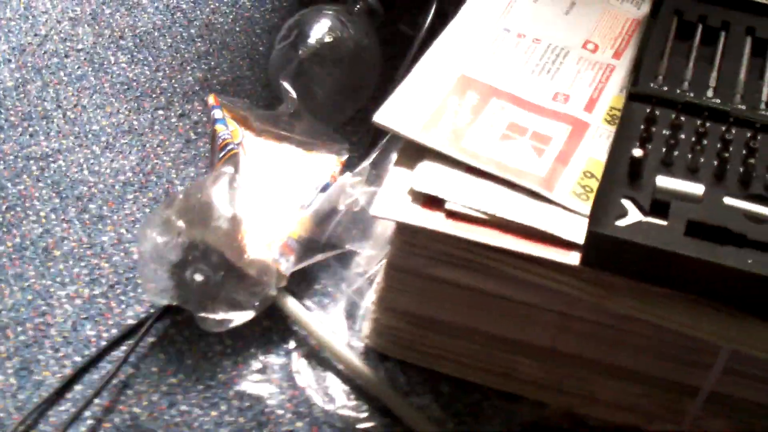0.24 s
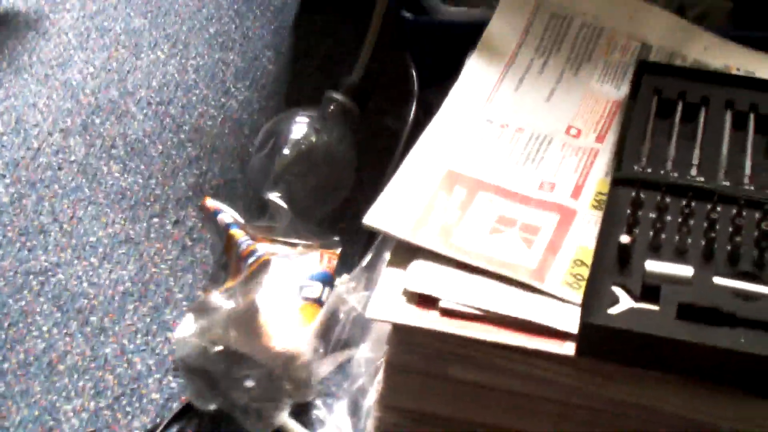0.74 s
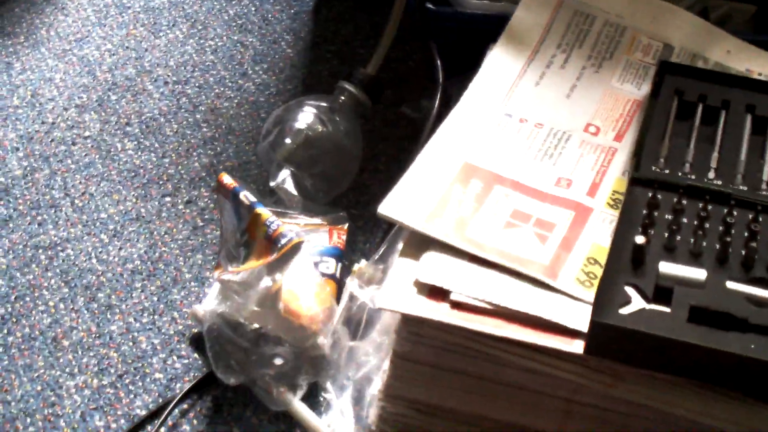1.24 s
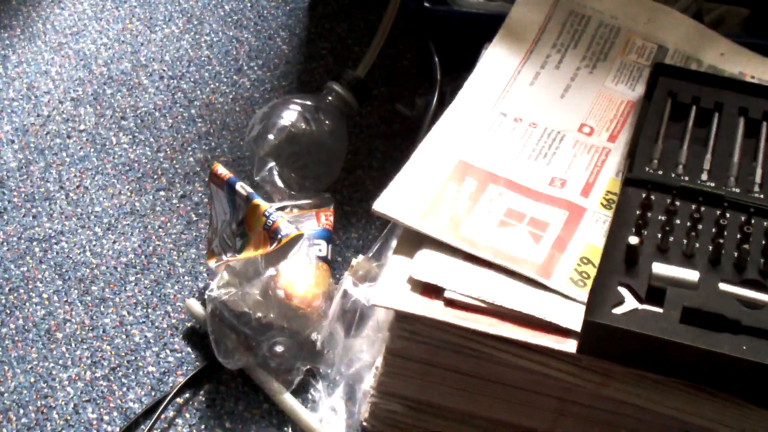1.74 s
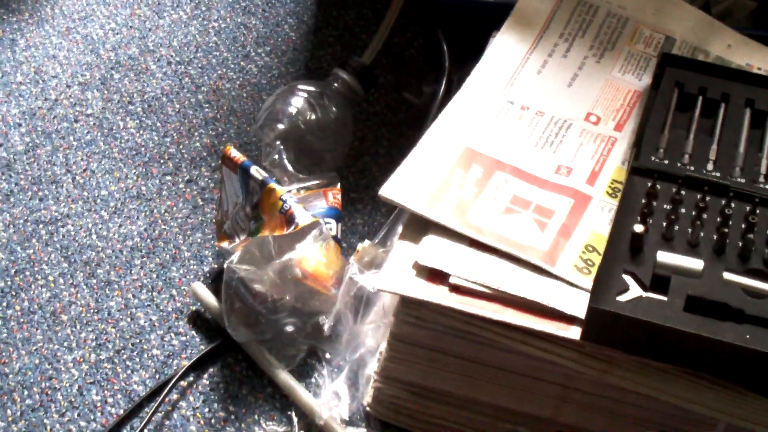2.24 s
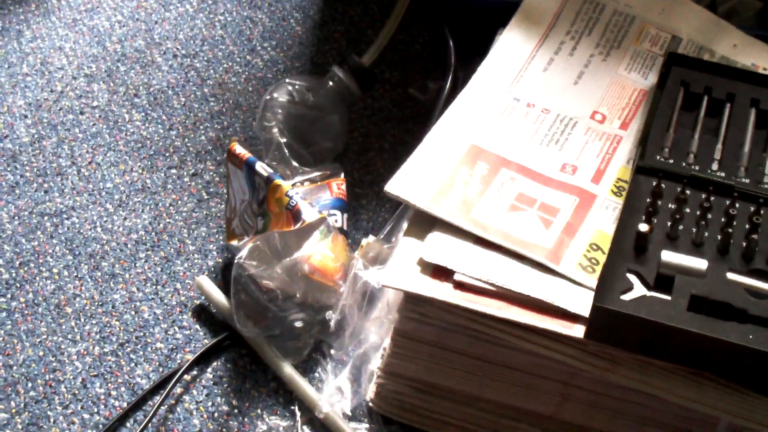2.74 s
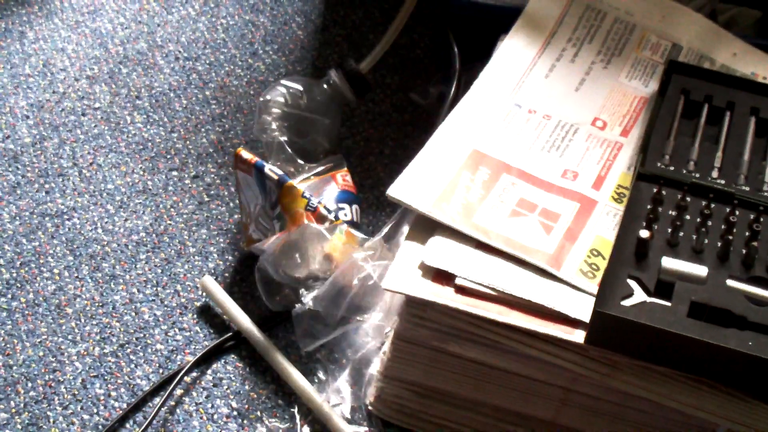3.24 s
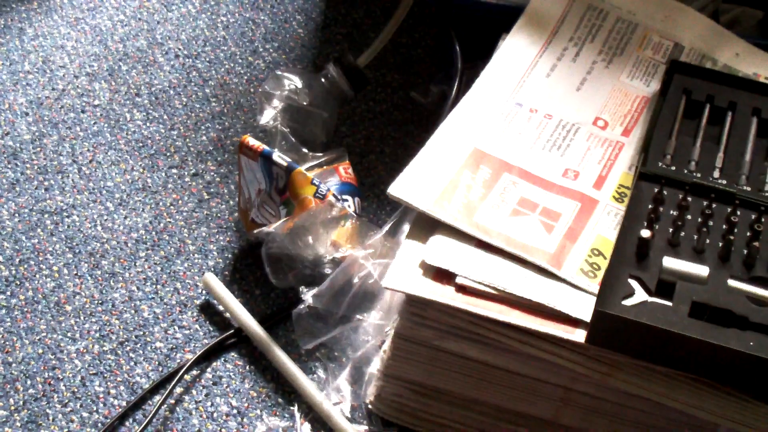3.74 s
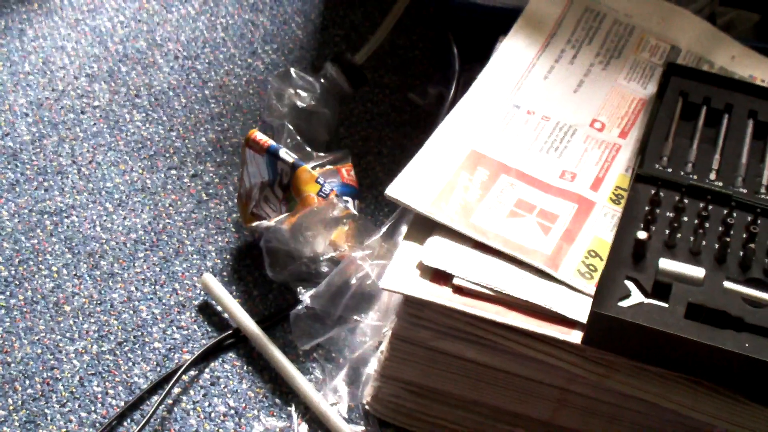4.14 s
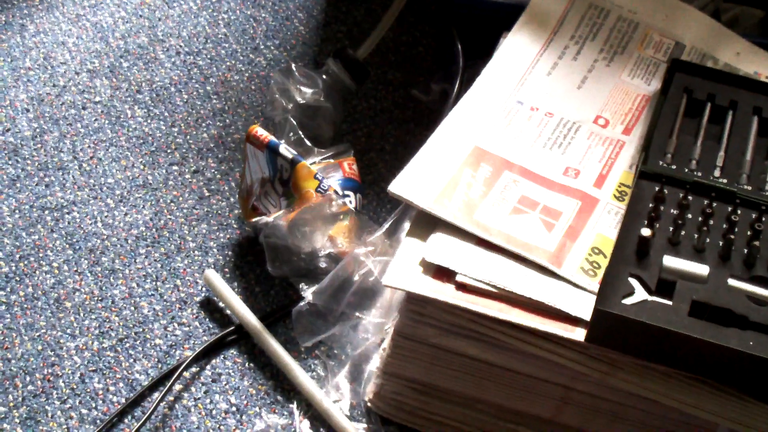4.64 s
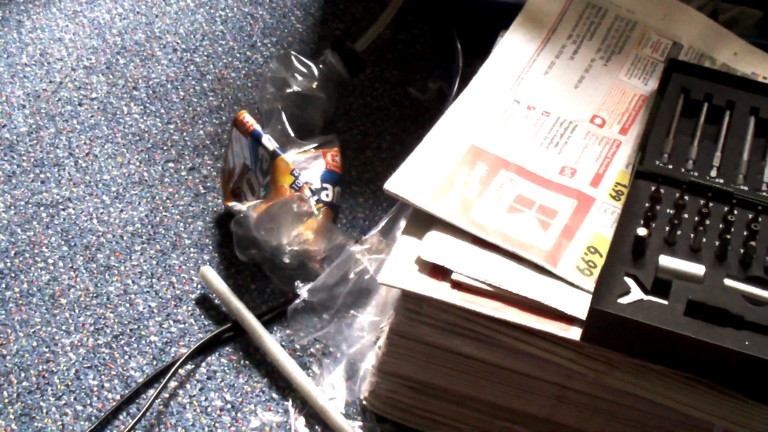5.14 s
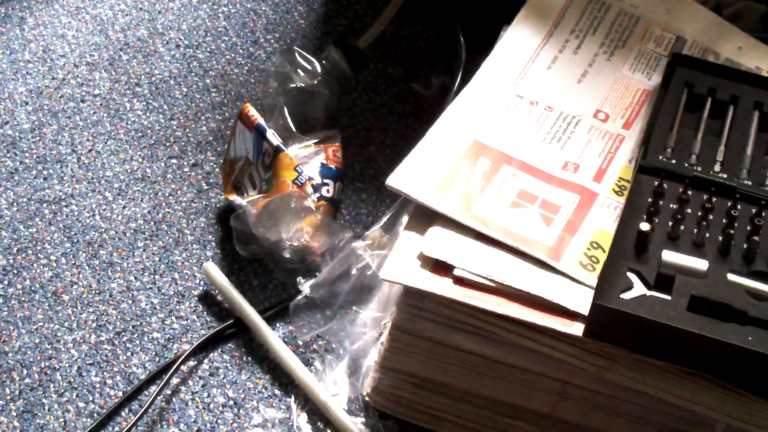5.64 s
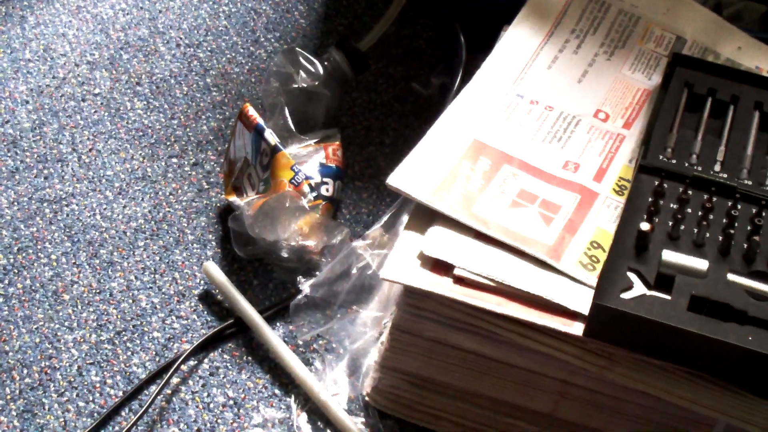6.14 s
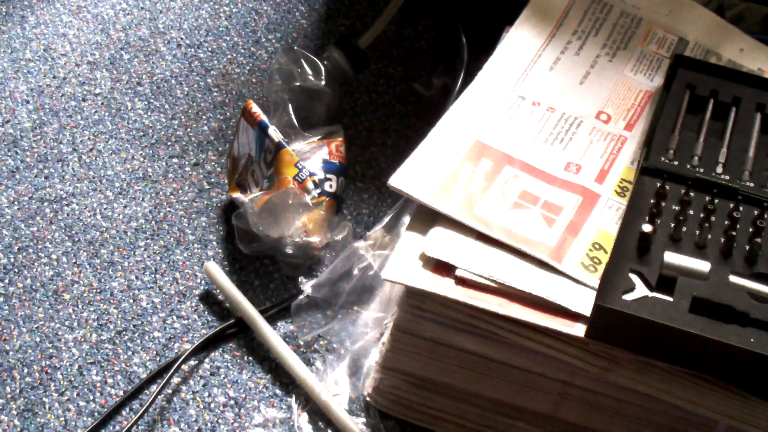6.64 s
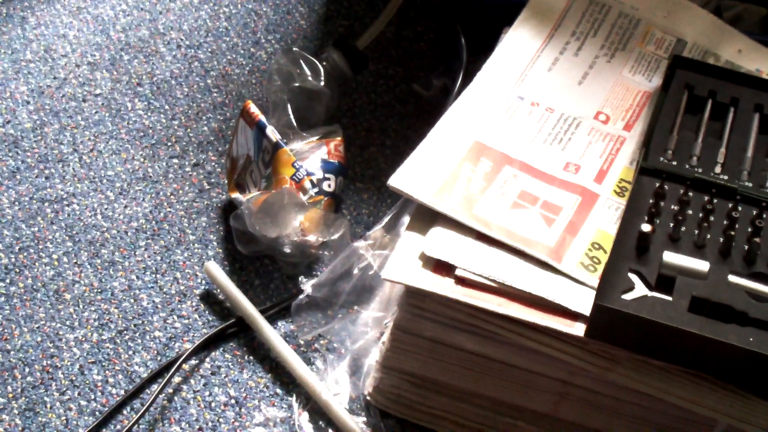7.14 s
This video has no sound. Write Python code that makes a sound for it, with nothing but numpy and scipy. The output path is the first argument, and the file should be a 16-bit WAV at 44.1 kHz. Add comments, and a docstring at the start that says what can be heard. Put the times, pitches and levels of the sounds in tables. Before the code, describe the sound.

In a small, fairly dry room, a thin plastic bottle collapses right beside the microphone. Hard irregular snaps and pops start at once, with crackly runs of creasing and small ticks between them. Below is a faint low pump hum, above it a bright hiss that slowly thins. The loudest snaps distort; after about five seconds they become sparser and mostly lighter.

```python
"""Small room, a microphone with two close ports right by a thin plastic bottle on the carpet.
From the start a vacuum pump hums low (sines over rumble), and a bright hiss (shaped noise) thins out as
the air runs out. At once the bottle is sucked flat: its wall buckles in single snaps, some followed by
small ticks, then also in longer runs of creasing. Each buckle is a burst of tiny slips coloured by the
wall, and the loud ones overload the microphone; towards the end the snaps grow sparse."""
import sys
import numpy as np
from scipy import signal
from scipy.fft import rfft, irfft, next_fast_len
from scipy.io import wavfile
from scipy.ndimage import uniform_filter1d

SR = 44100
rng = np.random.default_rng(int(sys.argv[2]) if len(sys.argv) > 2 else 0)


def waveform_to_disk(signal):
    """Save audio, clipped to [-1, 1], as 16-bit WAV at the path in sys.argv[1]."""
    frames = np.transpose(np.atleast_2d(signal))
    scaled = np.clip(frames, -1, 1) * 32767
    samples = np.round(scaled).astype(np.int16)
    wavfile.write(sys.argv[1], SR, samples)


N = 326781


def from_db(db):
    """Decibels to gain."""
    return 10 ** (np.asarray(db) / 20)


def unit(x):
    """Scale to an energy of one."""
    return x / np.sqrt(np.sum(x ** 2, axis=-1, keepdims=True) + 1e-20)


def at_hz(points, hz):
    """Read a table on a log-frequency axis."""
    points = np.array(points)
    return np.interp(np.log(np.maximum(hz, 1)), np.log(points[:, 0]), points[:, 1])


def butter(x, kind, edge_hz, order=2):
    """Causal Butterworth filter."""
    edge_hz = np.clip(edge_hz, 10, .45 * SR)
    sections = signal.butter(order, edge_hz, kind, fs=SR, output="sos")
    return signal.sosfilt(sections, x + 1e-18)


def resonance(x, hz, width_hz):
    """Two-pole resonance with a gain of one on top."""
    radius = np.exp(-np.pi * width_hz / SR)
    zeros = np.array([1, 0, -1]) * (1 - radius ** 2) / 2
    poles = [1, -2 * radius * np.cos(2 * np.pi * hz / SR), radius ** 2]
    return signal.lfilter(zeros, poles, x)


def coloured(x, gain_at):
    """Give a signal a smooth spectrum, passed as a function of frequency."""
    size = next_fast_len(x.shape[-1])
    spectrum = rfft(x, size) * gain_at(np.fft.rfftfreq(size, 1 / SR))
    return irfft(spectrum, size)[..., :x.shape[-1]]


def causal(gain_db):
    """Minimum-phase response for dB on an FFT grid: nothing sounds before the blow."""
    cepstrum = irfft(np.log(from_db(gain_db)))
    half = len(cepstrum) // 2
    cepstrum[1:half] *= 2
    cepstrum[half + 1:] = 0
    return np.exp(rfft(cepstrum))


def stereo_noise(gain_at, side_at):
    """Steady noise of a given spectrum, rms one in the middle, with a weaker side."""
    mid, side = unit(coloured(rng.standard_normal((2, N)), gain_at)) * np.sqrt(N)
    return mid + coloured(side, side_at) * np.array([[1], [-1]])


# pump motor, turning rate and its multiples: [f/Hz, level/dB rms]
PUMP_HUM = [(48.4, -51.5), (96.9, -49.5), (193.8, -61), (242.2, -60)]
# low rumble of pump and room: [f/Hz, relative level/dB per Hz]
PUMP_RUMBLE = [(20, 2), (42, 0), (70, -1), (100, -2), (140, -13.5), (250, -13), (600, -21), (1500, -38.5)]


def pump(rumble_db=-49.5, side_db=-7.5):
    """The motor turns steadily: sines at its rate and multiples, over low noise."""
    t = np.arange(N) / SR
    hum = 0
    for hz, db in PUMP_HUM:
        hum = hum + np.sqrt(2) * from_db(db) * np.sin(2 * np.pi * (hz * t + rng.random()))

    def rumble_gain(hz):
        """The rumble fades further above 2 kHz."""
        return from_db(at_hz(PUMP_RUMBLE, hz)) / (1 + (hz / 2000) ** 2)
    rumble = stereo_noise(rumble_gain, lambda hz: from_db(side_db))
    return hum + from_db(rumble_db) * rumble


# broad hiss: [f/Hz, relative level/dB per Hz]
HISS_SPECTRUM = [(300, -8), (1200, -5), (2000, -3), (3500, -7), (5000, -6), (7000, -5), (9000, 3.5),
                 (11000, 0.5), (12700, -0.5), (16000, -1)]
# narrow peaks on the shape of the hiss: [f/Hz, width at half amplitude/Hz, relative level/dB]
HISS_PEAKS = [(2800, 500, 5), (4120, 330, 13), (4600, 350, 8), (5650, 450, 4), (11800, 170, 10),
              (13460, 150, 13), (14720, 300, 11)]
# difference between the two ports in the hiss: [f/Hz, side level/dB]
HISS_SIDE = [(500, -5.5), (2400, -26), (4400, -28), (8000, -6), (15000, -10)]
# the broad hiss sinks as the air runs out; its narrow peaks sink more slowly
HISS_DB, HISS_FALL_DB_PER_S = -29.5, 1.0
PEAKS_DB, PEAKS_FALL_DB_PER_S = -34, .5


def hiss():
    """Shaped noise that slowly sinks, leaving a few narrow peaks standing."""
    def broad(hz):
        """Gain of the smooth hiss."""
        return from_db(at_hz(HISS_SPECTRUM, hz))

    def peaks(hz):
        """Gain of the narrow peaks."""
        power = 0
        for centre, width, db in HISS_PEAKS:
            power = power + from_db(db) ** 2 / (1 + (2 * (hz - centre) / width) ** 2) ** 2
        return broad(hz) * np.sqrt(power)

    def side(hz):
        """Gain of the difference between the ports."""
        return from_db(at_hz(HISS_SIDE, hz))
    t = np.arange(N) / SR
    smooth = from_db(HISS_DB - HISS_FALL_DB_PER_S * t) * stereo_noise(broad, side)
    narrow = from_db(PEAKS_DB - PEAKS_FALL_DB_PER_S * t) * stereo_noise(peaks, side)
    return smooth + narrow


# what the bottle radiates, the hollow note of the air inside near 430 Hz:
# [f/Hz, relative level/dB per Hz]
WALL = [(50, -1.5), (140, -1.5), (220, 3), (320, 5), (430, 4), (540, 0), (720, -2), (1000, -1), (1300, 3),
        (1750, -2), (2400, -1), (5200, -6.5), (7400, -8.5), (10000, -2.5), (16000, -12.5)]
PANEL_BLUR_DB_PER_DB = 0.31  # loss of the panel's note as the blow gets harder
SIZZLE_PER_SHARPNESS = 1.55  # sharpness lifts the crack one for one and the sizzle above it faster


def buckle(level_db, panel_hz, thump_db, sharpness_db, length_s, sizzle_offset_db=-11, grain_db=5.0,
           clump_db=3.5, first_db=0.5, fade=1.45, panel_db=9.5, panel_width_hz=90, panel_loss=0.13,
           evenness=0.23, bend_delay_s=.0007, size=8192):
    """A sudden flip and a burst of tiny slips pump the air inside, ring a panel and crack the crease."""
    t = np.arange(size) / SR
    hz = np.maximum(np.fft.rfftfreq(size, 1 / SR), 1)
    slips, grain, clumps = rng.standard_normal((3, size))
    # a crease advances in fits and starts, about a millisecond each
    clumps = unit(uniform_filter1d(clumps, size=48)) * np.sqrt(size)
    roughness = from_db(grain_db * grain + clump_db * clumps)
    slips = unit(slips * roughness * np.exp(-np.minimum((t / length_s) ** fade, 20)))
    # the first flip dominates a short snap and is lost in a long run
    slips[0] += from_db(first_db) * np.sqrt(0.00082 / length_s)
    # big flips thump, sharp creases crack and sizzle
    low = at_hz([(430, 1), (720, 0)], hz)
    high = at_hz([(1800, 0), (2900, 1)], hz)
    top = at_hz([(5500, 0), (8800, 1)], hz)
    sizzle_db = sizzle_offset_db + SIZZLE_PER_SHARPNESS * sharpness_db
    colour_db = at_hz(WALL, hz) + low * thump_db + (high - top) * sharpness_db + top * sizzle_db
    # the panel that flips rings briefly at its own pitch; small high panels die sooner
    half_width = panel_width_hz + panel_loss * panel_hz
    # a hard buckle drags its neighbours along, which blurs the note
    ring_db = max(panel_db - PANEL_BLUR_DB_PER_DB * max(level_db, 0), 0)
    colour_db = colour_db + ring_db / (1 + ((hz - panel_hz) / half_width) ** 2)
    # the slips supply the grain, while the wall sets most of the broad colour
    drive = rfft(slips)
    drive_db = 10 * np.log10(uniform_filter1d(np.abs(drive) ** 2, size=64) + 1e-9)
    # bending waves disperse: the lows leave the wall after the highs (delay given at 1 kHz)
    bend = np.exp(-4j * np.pi * bend_delay_s * np.sqrt(1000 * hz))
    sound = irfft(drive * bend * causal(colour_db - evenness * drive_db))
    return unit(sound) * from_db(level_db) * np.sqrt(length_s * SR)


# a panel of the wall flips; thump and sharpness are relative to the middle range:
# [t/s, relative level/dB, panel f/Hz, thump level/dB, sharpness level/dB]
SNAPS = [(0.023, 3, 770, -14.5, -11), (0.0712, 5, 620, -10, -2.5), (0.2954, 9.5, 2500, -13.5, -8.5),
         (0.357, -10.5, 1180, -12, -11.0), (0.377, -14.5, 870, -6.0, -17.0),
         (0.3967, -0.5, 5910, -22.0, -0.5), (0.4335, 7, 940, -10.0, 4), (0.5642, 2.5, 970, -3, -4),
         (0.6017, 0.5, 3150, -8.5, -2.0), (0.636, 6, 970, -10, 4), (0.887, 10.5, 399, -14, 0.5),
         (0.9815, -13, 2320, -4, -6.0), (1.0104, 1.5, 2480, -21, -6.5), (1.0802, -6, 840, 10.5, -17),
         (1.191, -20, 700, 5, -6.0), (1.211, 6, 710, -9.5, -2), (1.2321, 1.5, 734, -9.5, 4.5),
         (1.2791, 9.5, 1160, -9.5, -3.5), (1.3677, 6, 2370, -10, 3.5), (1.413, 10.5, 2370, -8.0, 1.5),
         (1.484, -10.5, 860, -6, -6), (1.543, -6, 2130, -11, -14.5), (1.5924, -3, 755, -11.0, -3),
         (1.623, -2.0, 2270, -9, 3), (1.6643, 5.5, 1140, -14.5, 5.5), (1.6982, 4.5, 2330, -9, 2.5),
         (1.742, 2, 920, -8, -4), (1.793, 9, 690, -3, 4.5), (1.817, 11, 660, -8, -8),
         (1.9429, -3.5, 2300, -28, -5.5), (1.9756, 6.5, 466, -8.5, -3), (2.0118, -3.5, 1460, -25, 9),
         (2.106, 6, 5130, -8.5, -8), (2.3013, -11, 740, 0, -21), (2.377, -13, 706, -9.5, -4),
         (2.425, -20, 686, -11.5, -31), (2.5373, -14.5, 330, -22.5, -12.5), (2.6154, 2, 2070, -1.5, 6),
         (2.7355, 9.5, 1430, -12, 3), (2.8245, -18.5, 5740, 13, 22), (2.8393, -13.5, 930, -1.5, -29),
         (2.882, -8.5, 1760, -4.5, -4), (2.9072, -11, 1190, 4.5, 3.5), (2.9816, -2.5, 1360, -7.5, -3.0),
         (3.018, -1, 6130, -14, 9), (3.0338, -1.5, 2270, -21, -3), (3.1733, -15, 2300, -18.0, 15),
         (3.369, 1, 1264, -11.5, 2), (3.3785, -3.5, 1050, -5.5, -2), (3.4096, -4.5, 4500, -18, 3.5),
         (3.44, 8.5, 1430, -9.5, 8.5), (3.577, 11.5, 670, -18, -5), (3.613, 8.0, 460, -16, 4.5),
         (3.654, -2, 480, -27, -11), (3.6858, 4.5, 440, -14, 4.5), (3.719, 9.5, 1500, -8.0, -2.5),
         (3.748, 7.5, 410, -13, 2.5), (3.81, -14.5, 470, -14.5, -17), (3.843, -16.0, 1240, -7, -6.0),
         (3.9053, -7.0, 2200, -14, 8.5), (3.9277, -9.5, 867, -4.5, -23.0), (3.9884, -6, 5380, -20, 1),
         (4.0629, 7, 1390, -7.5, -0.5), (4.094, -5.5, 1380, -9, 10), (4.17, -5.5, 1250, -22, 9),
         (4.1973, -1.5, 1310, -15, 9.5), (4.269, 1.5, 2800, -16, 5.5), (4.3413, 3, 2010, -6, 14),
         (4.386, -3, 1200, -3, -2.5), (4.3995, 5, 1105, -15, 6.5), (4.5005, 13.5, 870, -6.5, -2.0),
         (4.5676, -3.5, 2880, -4.5, -5), (4.623, -2.5, 373, -12, -2.5), (4.7798, 10.5, 1900, -5.5, -1.0),
         (4.8203, 2.5, 2080, -18, 7.5), (5.088, -4.5, 2940, -6, -6), (5.2011, -3.5, 2140, -15.5, 1.5),
         (5.3044, -19.5, 1730, -12, 9), (5.433, -3, 1990, -10, 11), (5.568, -1, 2970, -38, 6.5),
         (5.687, -10, 2030, -12.5, 5), (5.813, -3.5, 5500, -11.0, 9.5), (5.964, -22, 2040, -5.0, -1),
         (5.984, -19.5, 1500, -9, 13.5), (6.0691, -5, 2110, -8.5, 6), (6.106, -21, 2140, -14, -2),
         (6.194, 4.5, 1820, -18, 12.0), (6.289, 1, 1950, -18, 17), (6.653, -21, 2300, -29, 6.5),
         (6.7145, 0.0, 2940, -11, -2), (6.733, -11.5, 2410, -24, -2), (7.089, -15, 2420, -28, 12),
         (7.1332, -14, 3550, -11.0, 1), (7.3916, -14, 5910, -8, -0.5)]
SNAP_S = 0.0033  # decay time of the slips in a flip


def snaps():
    """Single flips of a panel, all equally short: (s, sound)."""
    return [(s, buckle(db, hz, thump_db, sharpness_db, SNAP_S))
            for s, db, hz, thump_db, sharpness_db in SNAPS]


# the wall settles with a faint tick after some of the hard snaps
HARD_SNAP_DB, TICK_SHARE, TICK_WAIT_S = 2.0, 0.33, (.015, 0.098)
TICK_DB, TICK_SPREAD_DB, TICK_SPREAD_OCTAVES = -18.5, 4.5, .5


def ticks():
    """After a hard snap a neighbouring panel may settle with a faint tick of similar colour: (s, sound)."""
    out = []
    for s, db, hz, thump_db, sharpness_db in SNAPS:
        if db <= HARD_SNAP_DB or rng.random() >= TICK_SHARE:
            continue
        wait_s = rng.uniform(*TICK_WAIT_S)
        louder, higher = rng.standard_normal(2)
        tick_db = TICK_DB + TICK_SPREAD_DB * louder
        tick_hz = hz * 2 ** (TICK_SPREAD_OCTAVES * higher)
        sound = buckle(tick_db, tick_hz, thump_db, sharpness_db, SNAP_S, size=4096)
        out.append((s + wait_s, sound))
    return out


# a crease runs along the wall: [t/s, relative level/dB, panel f/Hz, decay time of the slips/s]
CREASES = [(0.652, 1.5, 960, 0.03), (1.749, -2.5, 940, 0.018), (1.829, -7, 714, 0.011),
           (1.9866, -4.5, 596, 0.016), (2.2102, 7.5, 1970, 0.0063), (3.1961, -2.5, 2030, .024),
           (3.452, -5, 1360, .016), (3.506, -.5, 1540, 0.023), (4.143, -4.5, 2870, 0.01),
           (4.2207, -4, 1320, 0.025), (4.8552, -6, 1510, 0.016), (6.1614, -1.5, 1830, 0.022),
           (6.2276, -3.5, 2030, 0.025)]
CREASE_THUMP_DB, CREASE_SHARPNESS_DB = -5.5, 5


def creases():
    """Longer runs of slips, all equally sharp, that stick and jump more than a single flip: (s, sound)."""
    return [(s, buckle(db, hz, CREASE_THUMP_DB, CREASE_SHARPNESS_DB, max(length_s, SNAP_S),
                       sizzle_offset_db=-9.5, grain_db=6.0, clump_db=5.0, fade=1.56, panel_db=7))
            for s, db, hz, length_s in CREASES]


# decay of the room: [f/Hz, time to fall 60 dB/s]
ROOM_T60 = [(150, 0.23), (400, 0.18), (1000, 0.16), (2800, 0.13), (7000, 0.13)]
# desk, floor and walls close by: [mean delay t/s, level/dB]
ECHOES = [(.0021, -22.5), (.0034, -25), (0.013, -24), (0.0125, -35.5), (0.0162, -33)]
# difference between the two ports for the bottle: [f/Hz, side level/dB]
BOTTLE_SIDE = [(200, -22), (1000, -38.5), (2400, -28.5), (4400, -20.5), (8000, -11), (15000, -2.5)]


def room(tail_db=-12.5, build_s=0.0058, port_blur_s=0.0022):
    """Near echoes, then a short tail; the two close ports differ mostly in the treble."""
    t = np.arange(SR // 4) / SR
    edges = np.geomspace(60, 16000, 9)
    tail = 0
    for low, high in zip(edges, edges[1:]):
        band = butter(rng.standard_normal((2, len(t))), "band", [low, high])
        tail = tail + band * from_db(-60 * t / at_hz(ROOM_T60, np.sqrt(low * high)))
    build_up = 1 - np.exp(-(t / build_s) ** 2)
    mid, side = from_db(tail_db) * unit(tail * build_up)
    mid[0] += 1  # direct sound
    # every path has slightly different echo delays
    for delay, echo_db in ECHOES:
        stretch = 1 + .15 * rng.uniform(-1, 1)
        mid[round(delay * SR * stretch)] += from_db(echo_db)
    side = side + unit(rng.standard_normal(len(t)) * np.exp(-t / port_blur_s))
    padded = np.pad(side, (0, len(t)))
    side = coloured(padded, lambda hz: from_db(at_hz(BOTTLE_SIDE, hz)))[:len(t)]
    return np.array([mid + side, mid - side])


def bottle(count=24):
    """Creases face different ways, so the buckles take turns on different paths to the microphone."""
    paths = [room() for _ in range(count)]
    out = np.zeros((2, N + SR))
    for k, (s, sound) in enumerate(snaps() + creases() + ticks()):
        heard = signal.fftconvolve(sound[None], paths[k % count], axes=1)
        start = round(s * SR)
        out[:, start:start + heard.shape[1]] += heard
    return out[:, :N]


# resonances of the room and the furniture, the same for every buckle: [f/Hz, width/Hz, level/dB]
ROOM_MODES = [(191.4, 35, -9), (235, 14, -9.5), (368, 7.3, -4), (438.2, 28.6, 0.5), (722.5, 75, -4),
              (796, 8.7, -2), (949, 25, -4), (1021, 39, -3.5), (1287, 9.3, -12), (1373, 10, -31.5),
              (2283, 210, -8.5)]


def standing_waves(x):
    """The room's modes ring on after each buckle."""
    return x + sum(from_db(db) * resonance(x, hz, width_hz) for hz, width_hz, db in ROOM_MODES)


def scene():
    """The bottle in the room, over pump and hiss."""
    return pump() + hiss() + from_db(-1.5) * standing_waves(bottle())


def record(dry, top=0.91, notch_width_hz=2400, cutoff_hz=15800):
    """Loud snaps overload; the microphone has a deep notch at 7900 Hz and a steep top end."""
    clipped = np.clip(dry, -top, top)
    notched = clipped - .9 * resonance(clipped, 7900, notch_width_hz)
    low_pass = signal.ellip(10, .1, 70, cutoff_hz, fs=SR, output="sos")
    return signal.sosfilt(low_pass, notched)


dry = scene()
out = record(dry)
waveform_to_disk(out)
```